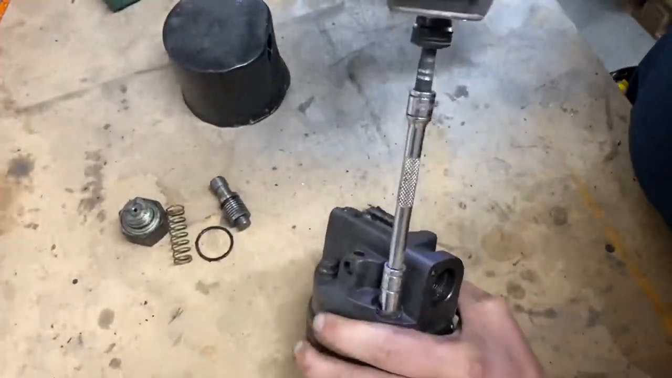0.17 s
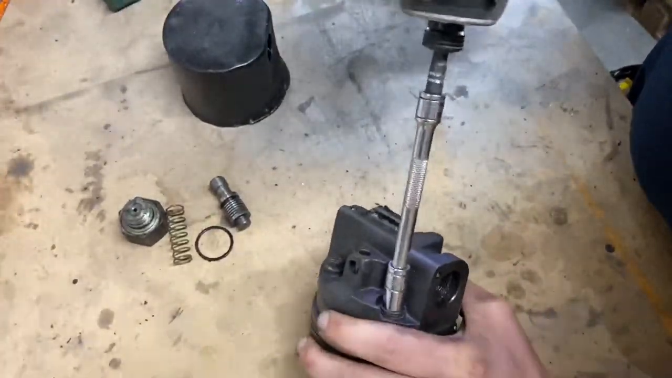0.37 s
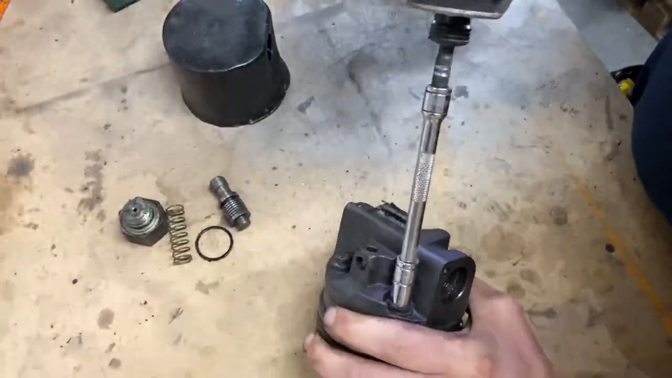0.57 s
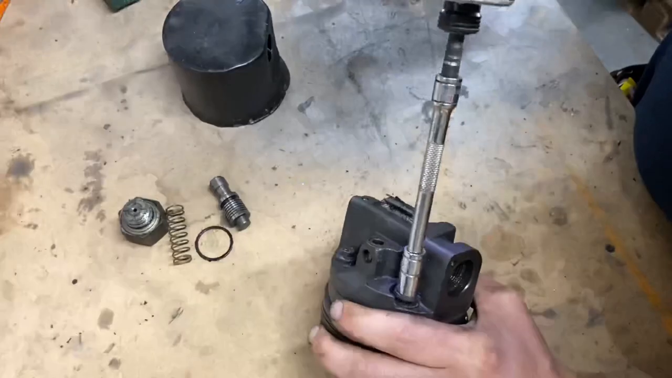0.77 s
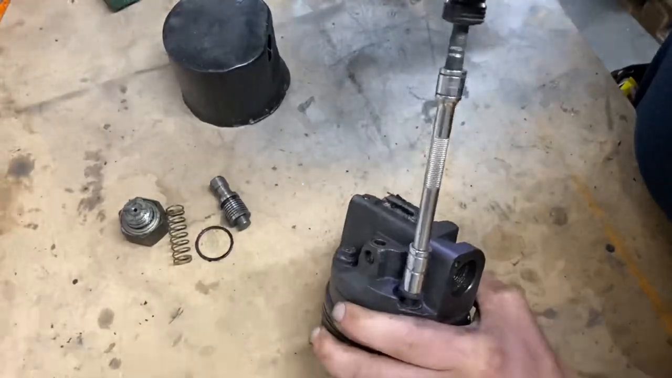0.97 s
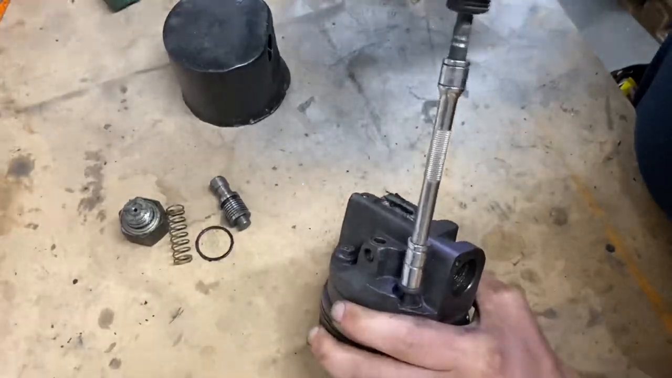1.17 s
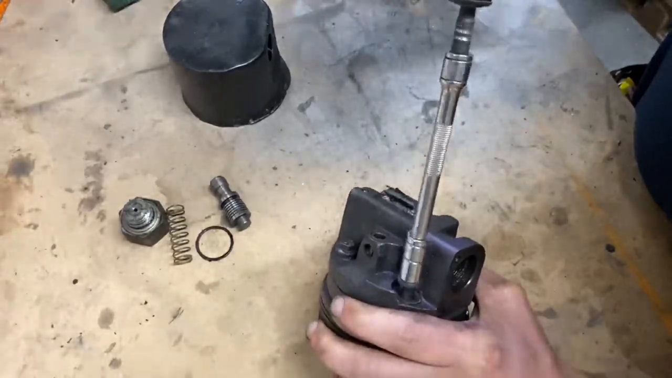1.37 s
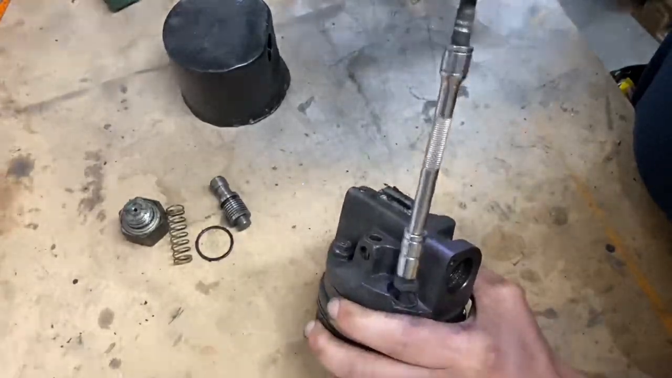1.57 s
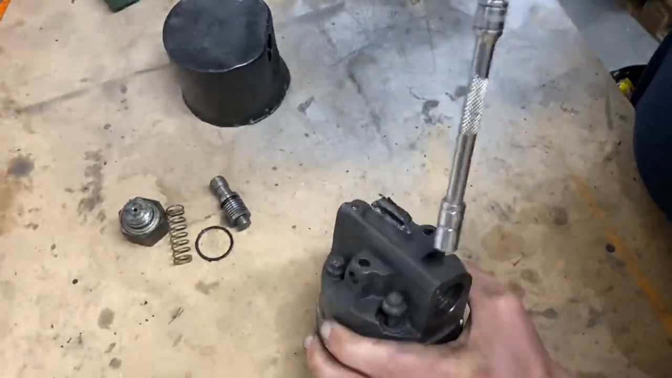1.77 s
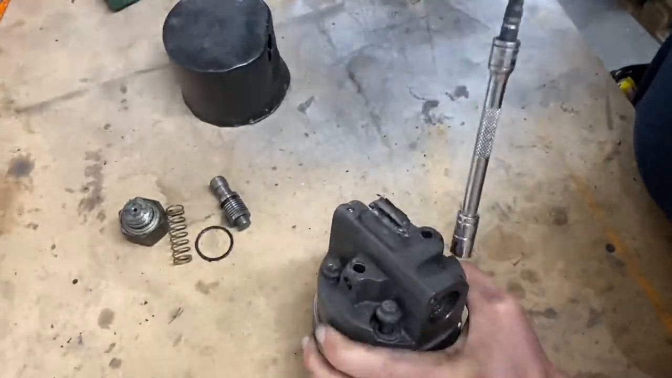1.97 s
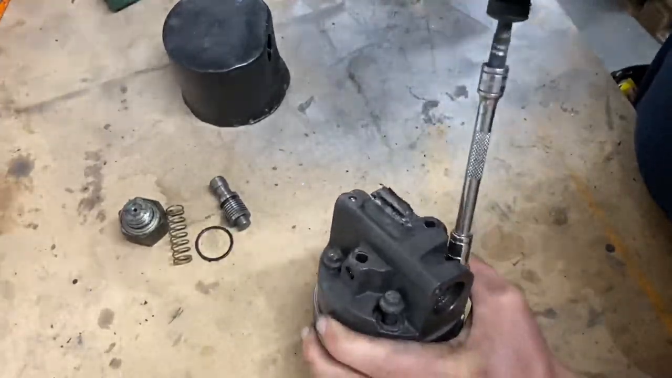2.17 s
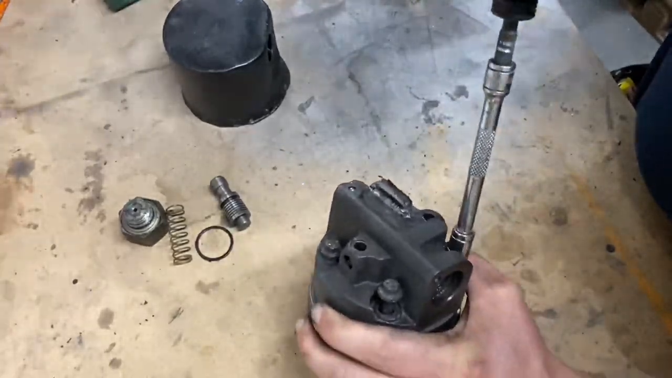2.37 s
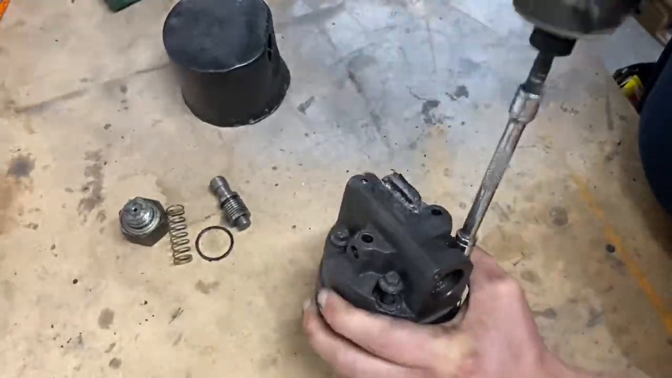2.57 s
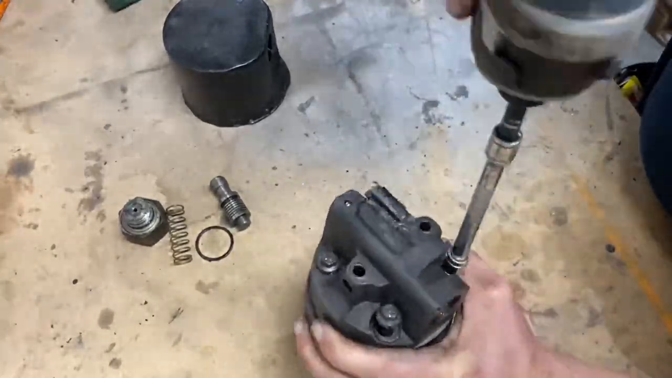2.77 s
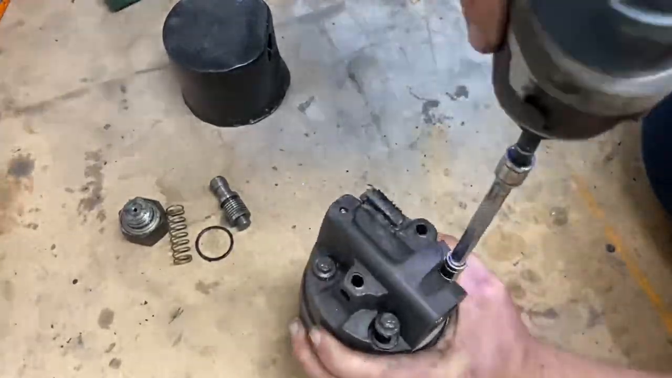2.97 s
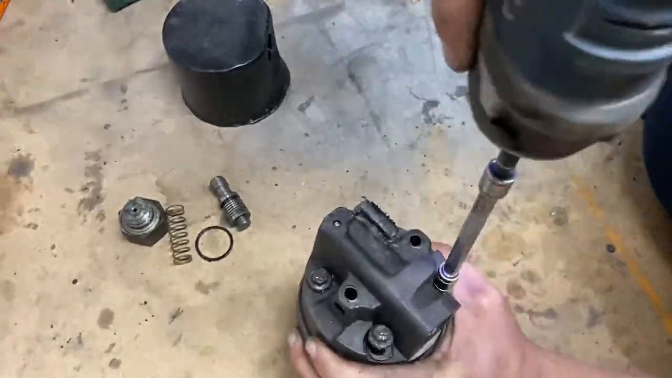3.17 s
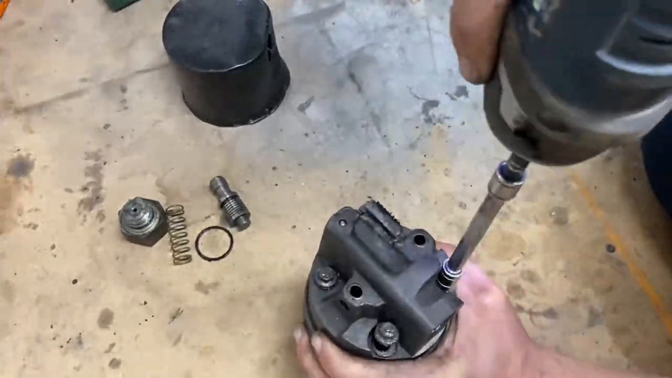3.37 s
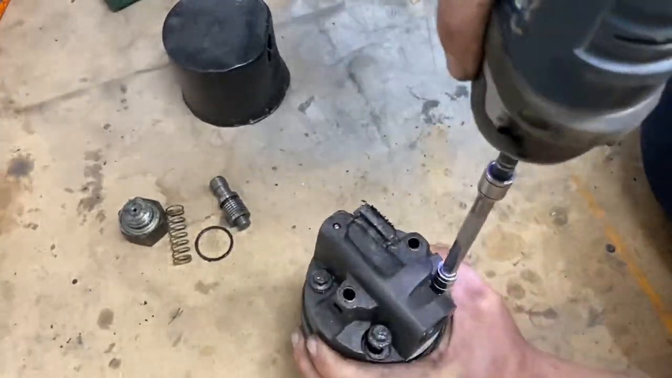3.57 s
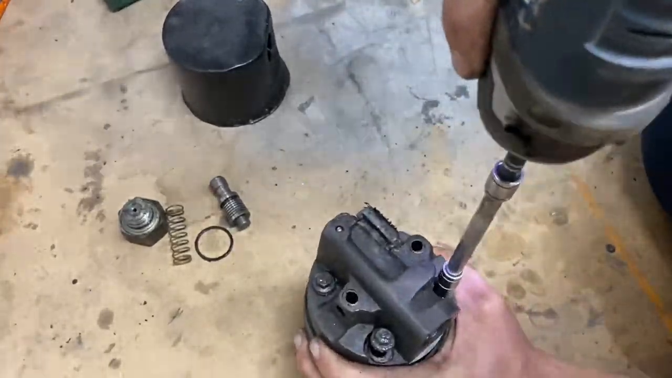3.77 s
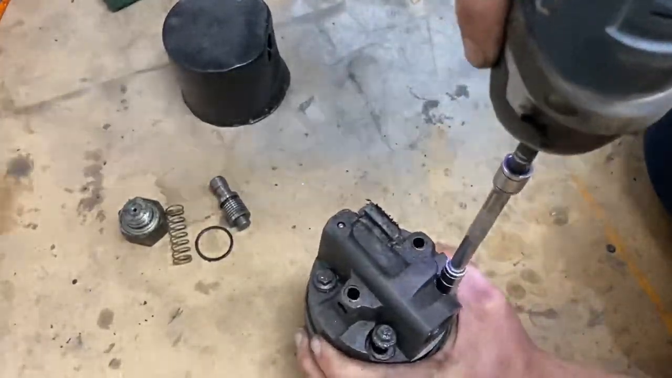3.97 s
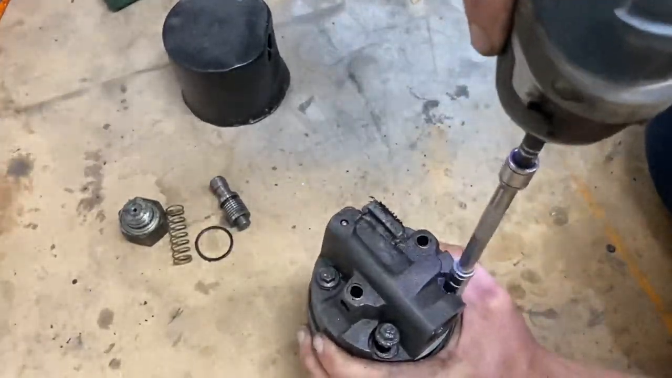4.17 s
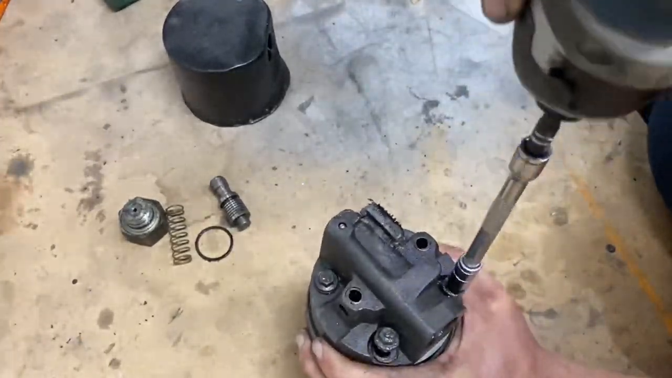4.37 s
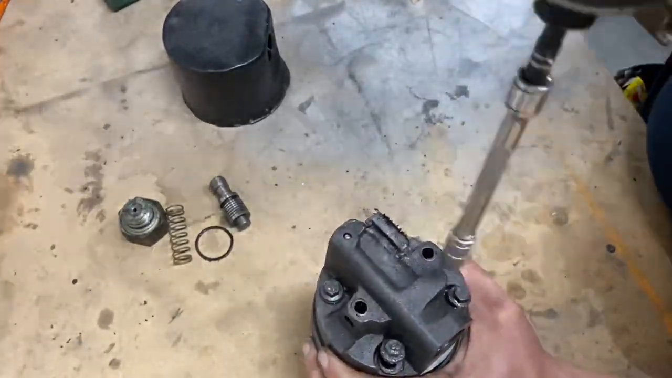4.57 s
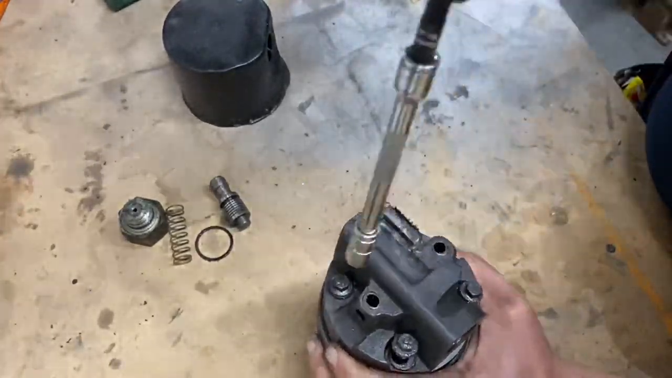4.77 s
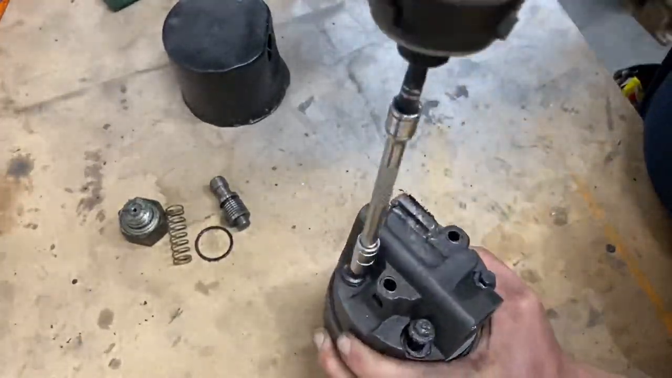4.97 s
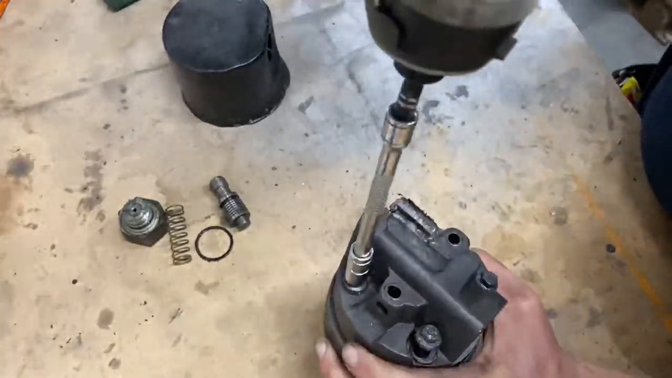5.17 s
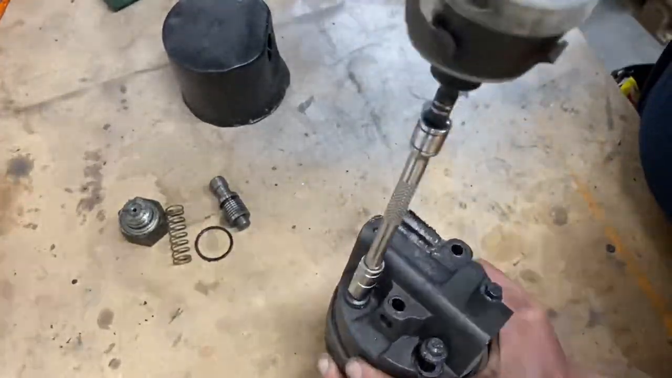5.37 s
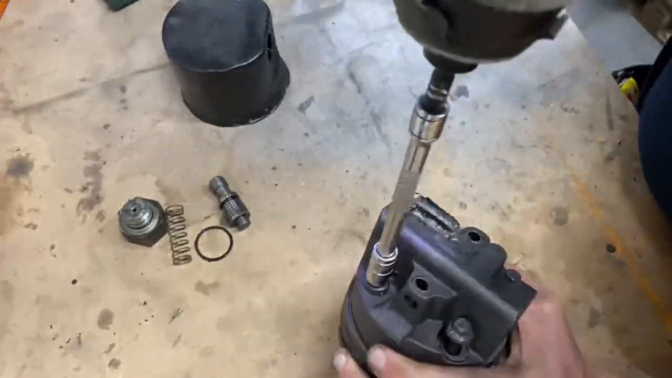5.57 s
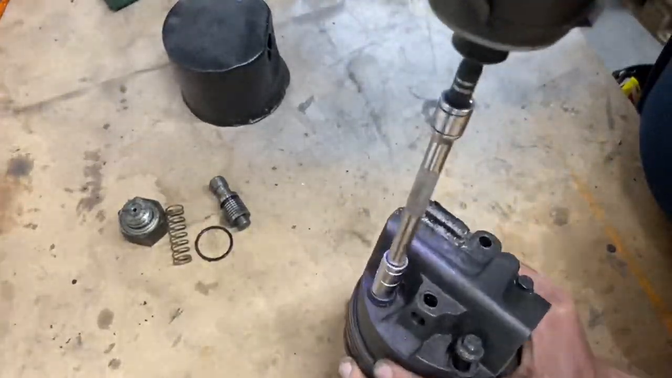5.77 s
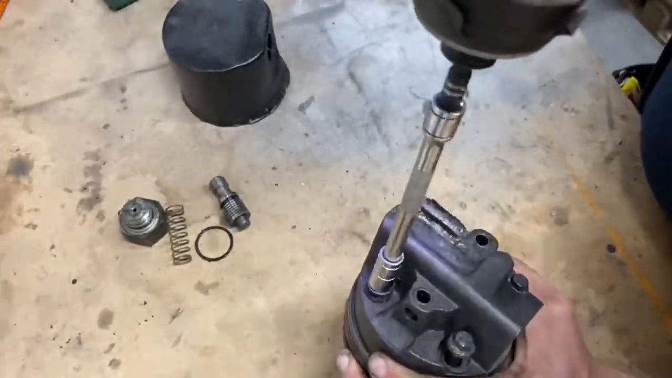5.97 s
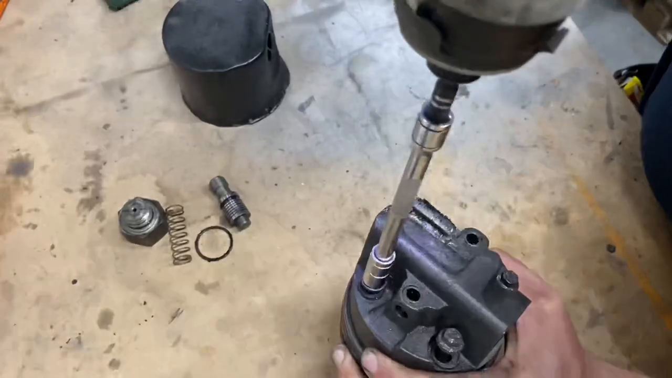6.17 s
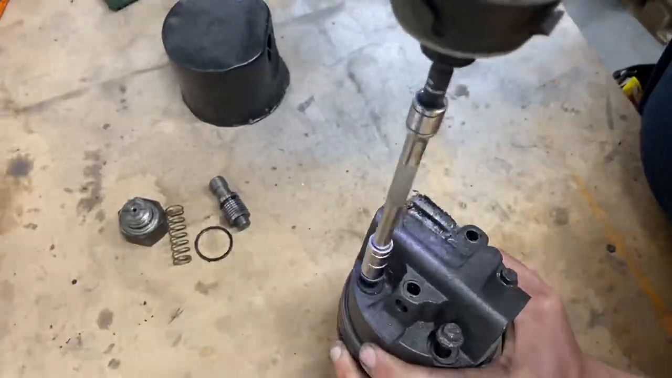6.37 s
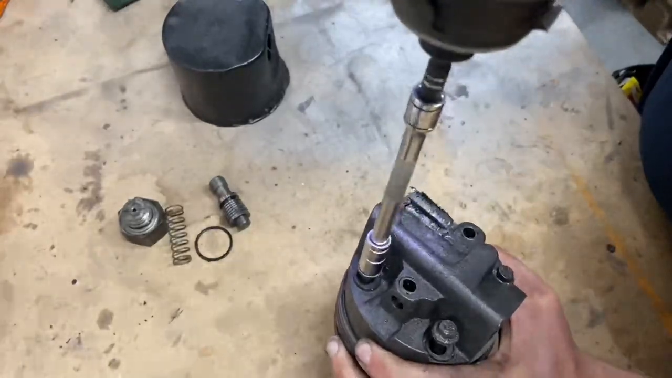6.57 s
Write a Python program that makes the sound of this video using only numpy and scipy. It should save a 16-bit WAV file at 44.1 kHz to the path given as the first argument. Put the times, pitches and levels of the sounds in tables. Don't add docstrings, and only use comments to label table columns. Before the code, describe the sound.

A cordless power driver whirs in three runs, hammering and rattling bolts loose from a metal casting, with socket clicks and knocks between.

```python
import sys
import numpy as np
from scipy import signal
from scipy.fft import rfft, irfft, next_fast_len
from scipy.io import wavfile
from scipy.ndimage import uniform_filter1d, map_coordinates

SR = 44100
rng = np.random.default_rng(int(sys.argv[2]) if len(sys.argv) > 2 else 0)


def inscribe(sig):
    pcm = np.round(np.clip(np.atleast_2d(sig).T, -1, 1) * 32767)
    wavfile.write(sys.argv[1], SR, pcm.astype(np.int16))


def to_linear_factor(level_db):
    exponent = np.asarray(level_db, float) / 20
    return 10 ** exponent


N = 291145
TIME = np.arange(N) / SR

# f/Hz, density/dB
SHOP = [(25, -34.5), (42, -2), (162, -2), (237, -6), (361, -7.5), (506, -6), (740, -15), (895, -11.5),
        (1550, -22), (2080, -14.5), (3240, -22.5), (5380, -22.5), (6500, -27.5), (8450, -59.5),
        (14300, -120)]
# t/s, level/dB
SHOP_DB = [(0.0, -45.5), (0.12, -53), (0.7, -59), (1.3, -53), (1.84, -64.5), (2.2, -57.5), (3.03, -62),
           (3.7, -61), (4.3, -60), (5.3, -60.5), (6.6, -50.5)]
# f/Hz, coherence/1
SHOP_ALIKE = [(60, 0.93), (130, 1), (290, 0.3), (640, 0.31), (1400, 0.44), (3100, 0.4), (6000, 0.18)]
# f/Hz, density/dB
MIC = [(5500, -44), (6800, 2), (8200, -0.5), (10000, -5), (12000, -3.5), (14000, -12.5), (15500, -15.5),
       (16000, -62.5)]
# f/Hz, level/dB rms
HUM = [(58, -64.5), (85, -66.5)]
# f/Hz, density/dB
FAR = [(1800, -33), (2050, -6.5), (2250, -3.5), (2500, -5.5), (2800, -33.5)]
# t/s, length/s, level/dB
FAR_SWELLS = [(2.05, .15, -73), (4.45, 0.23, -70), (4.85, 0.214, -67), (5.25, 0.11, -76)]
# t/s, f/Hz, level/dB, length/s
BUMPS = [
    (0.043, 95, -49.5, 0.74),
    (0.2622, 660, -15, 0.0033),
    (2.415, 170, -54, 0.079),
    (2.5, 200, -53, 0.047),
    (2.89, 190, -52.5, 0.09),
    (4.463, 180, -57.5, 0.12),
    (5.643, 413, -24.5, 0.0046),
    (5.645, 160, -48.5, 0.085),
]

# f/Hz, t60/s
ROOM = [(200, 0.23), (2000, 0.33), (6000, 0.12), (14000, 0.05)]
# f/Hz, level/dB
GLANCE = [(1500, -34), (2100, -23.5), (2700, -5.5), (4200, -2.5), (5000, -4), (6200, -15.5), (9000, -13.5),
          (16000, -7.5)]
GLANCE_T60_S = 0.016
# f/Hz, phase/rad
PORT_LEAD = [(60, -.15), (690, -.55), (2100, 0), (2800, .8), (3880, 1.3), (4700, -.8), (5400, .1),
             (6300, 1.6), (6750, 2.95), (7900, 3.35), (9500, 6.05), (11500, 6.45), (12700, 9.2),
             (14400, 9.65), (15800, 12.3)]
# f/Hz, level/dB
PORT_TILT = [(60, -.3), (200, -1), (380, -2.6), (700, -2.4), (1290, -2), (2070, -1.5), (2750, -6),
             (3450, -4.5), (4400, -3), (5500, 1), (6600, 0)]

# t/s, length/s, level/dB
RUSTLES = [(1.78, 0.091, -68), (1.93, 0.069, -72.5), (2.07, .07, -62), (2.22, 0.055, -74), (2.38, .08, -68),
           (2.55, .08, -68), (2.9, 0.11, -74.5), (4.62, 0.11, -72), (4.84, 0.07, -66), (5.07, 0.13, -64),
           (5.22, .08, -73), (5.35, 0.0597, -81)]
# f/Hz, density/dB
CLOTH = [(1500, -28), (2500, -17), (5000, -8.5), (6500, -10), (8000, -6.5), (10000, -5), (12000, -12),
         (15500, -32.5)]
# t/s, length/s, level/dB
CHATTER = [
    (3.09, 0.08, -45),
    (3.42, 0.36, -38),
]
# f/Hz, density/dB
SHUDDER = [(400, -40), (540, -10), (650, 1.5), (780, -9.5), (1000, -39)]
# t/s, length/s, level/dB
RATTLES = [
    (3.62, 0.092, -42.5),
    (3.97, 0.38, -36),
]
# f/Hz, density/dB
RATTLE = [(1200, -38.5), (1420, -7.5), (1580, 1.5), (1750, -7.5), (2100, -33)]

# t/s, peak level/dB, ring f/Hz, t60/s
TICKS = [(2.1325, -30, 3750, .008), (2.1935, -38.5, 3500, .014), (2.1993, -32.5, 3000, 0.0056),
         (2.2596, -37, 2530, .008), (2.6185, -42, 8500, .008), (2.6276, -31, 8500, .006),
         (2.6852, -48.5, 3500, .01), (2.772, -46, 2210, 0.0099), (3.0019, -14.5, 2950, 0.0066),
         (3.038, -34, 2200, .006), (3.163, -6, 1710, 0.013), (3.1723, -11, 2200, .006),
         (3.109, -24, 3000, .005), (3.128, -22, 2500, .005), (3.188, -18.5, 1500, 0.0029),
         (3.2013, -11, 1800, 0.0077), (3.2051, -6, 4660, 0.0072), (4.9762, -23, 5830, 0.0038),
         (5.0008, -37, 4500, .006), (5.025, -33, 10800, .007), (5.1032, -32, 4600, .008),
         (5.1599, -34, 6000, 0.005), (5.1648, -23, 2420, 0.0049), (5.3156, -32, 5070, 0.0047),
         (5.4445, -58, 9500, .006), (5.4541, -24.5, 2200, 0.004)]
TICK_SNAP_DB = -5.5
# t/s, peak level/dB, thud/dB re peak, edge/dB re peak
BLOWS = [(0.2640, -12, -24.5, -12.5), (0.2672, -18.5, -24.5, -6.5), (0.2699, -8, -14, -10.5),
         (0.2804, -10.5, -16, -4.5), (0.2875, -14, -23.5, -8), (0.3082, -13.5, -13.5, -7.5),
         (0.3135, -22, -8, -3), (3.1508, -8.5, -15.5, -15.5), (3.1605, -13, -12, -3.5),
         (3.164, -15, -12, -8.5), (3.1714, -11, -15, -7), (3.1755, -16.5, -13.5, -17.5),
         (3.1992, -8, -21.5, -12.5), (3.2052, -17.5, -20, -4.5), (5.6375, -13.5, -10.5, -14)]
# t/s, peak level/dB, thud/dB re peak, edge/dB re peak
KNOCKS = [(0.0543, -26.5, -9.5, -4), (0.1795, -37, -16.5, -16.5), (2.1312, -33.5, -16.5, -5.5),
          (2.199, -30.5, -15.5, -12), (2.2578, -38, -12, -11), (2.356, -42, -11, -11),
          (2.4863, -20.5, -3.5, -12), (2.5004, -28.5, -16.5, -15), (2.6274, -27.5, -12.5, -18.5),
          (2.6833, -43.5, -8, -13.5), (2.772, -41, -18, -18), (2.8317, -52, -9, -2.5),
          (2.9437, -30.5, -11.5, -14.5), (3.002, -26, -13.5, -8.5), (3.0095, -25, -9, -17),
          (4.3294, -36, -15, -22), (4.4096, -45, -10, -11), (4.586, -55, 0, -1.5), (4.9752, -35, -18, -3),
          (5.0, -40, -9, -8.5), (5.0248, -32.5, -9, -9), (5.1026, -32, -9, -18), (5.1633, -21, -8.5, -12),
          (5.3085, -33, -3, -19), (5.3294, -39.5, -19, -26), (5.3544, -49, -11, -18),
          (5.4495, -32, -10, -31), (5.456, -39, -5.5, -27), (5.445, -42.5, -3.5, -20),
          (2.949, -30.5, -8.5, -23), (2.4835, -40, -1.5, -13), (5.4791, -49, -9, -11),
          (5.5433, -41, -16, -16.5)]
# t/s, peak level/dB, thud/dB re peak, edge/dB re peak
FURTHER_KNOCKS = [(0.191, -41, -15, -14.5), (0.204, -39, -3, -15.5), (0.214, -41.5, -15, -18),
                  (1.8687, -58, -2, 0.5), (0.1652, -45, -9, -19), (2.193, -33.5, -14, -12), (2.245, -43.5, -2, -4),
                  (2.4665, -41, -3, -10), (2.618, -48, -4, -7.5), (2.984, -28.5, -13, -15),
                  (5.159, -30.5, -18, -8), (5.285, -44.5, -4, -23), (5.316, -36, -10, -8.5), (4.35, -49, -3, -22),
                  (5.432, -44, 4, -24), (5.575, -47, -9, -18), (5.605, -36, -2, -22)]
# f/Hz, level/dB, t60/s
CASTING = [(619, -2.5, 0.098), (1020, -11.5, 0.029), (1550, -15, 0.023), (2573, -5.5, 0.03),
           (3490, -8, 0.038), (4950, -7, 0.025)]
# f/Hz, density/dB
CLACK = [(600, -16), (1100, -3), (1700, -1), (2700, -5.5), (3300, -9), (4200, -39.5)]
# f/Hz, density/dB
THUD = [(100, -30.5), (200, -29), (380, -3.5), (600, -5), (950, -8.5), (1500, -67)]
# f/Hz, density/dB
EDGE = [(2800, -30), (3700, -2.5), (5000, -2), (7500, -0.5), (9000, -25.5)]
# f/Hz, density/dB
HISS = [(5500, -39.5), (6800, 3), (8200, 0.5), (9500, -5.5), (12000, -3.5), (14000, -8.5), (15500, -4),
        (16000, -48.5)]
FIZZ_PER_EDGE, FIZZ_DB = 1.24, -3.5
LIGHT_IS_SHORT = 0.14
GRAZE_S, GRAZE_DB = .003, -18
MODE_SCATTER_DB = 2.5

# multiple of the mesh rate/1, level/dB
ORDERS_A = [(.5, -6), (1, 0.5), (1.5, -6.5), (2, -3.5), (2.5, 0), (3, -2), (3.5, -32.5), (4, -4), (4.5, -8),
            (5, -7), (5.5, -23), (6, -4.5), (6.5, -6), (7, -5.5), (8, -26), (9, -10), (10, -20)]
ORDERS_B = [(.5, -9), (.87, -11), (1, -9), (1.5, -15), (2, -5), (2.5, -6), (3, 1), (3.5, -2), (4, 2),
            (4.5, -11), (5, -10), (5.5, -13), (6, -1), (6.5, -14), (7, -9), (8, -6), (9, -20), (11, -17),
            (12, -20)]
ORDERS_C = [(.5, -13), (1, -1.5), (1.5, -9.5), (2, 1.5), (2.5, -9), (3, -1), (3.5, -16), (4, -4.5),
            (4.5, -16), (5, -7.5), (5.5, -14), (6, -4), (6.5, -16), (7, -7), (8, -18), (9, -17), (10, -19),
            (12, -20)]
# multiple of the mesh rate/1, level/dB
SLOW_A = [(.5, -22.5), (1, -7.5), (1.5, -12), (2, -8.5), (2.5, -7.5), (3, -3), (3.5, -0.5), (4, -5.5),
          (4.5, -5), (5, 1.5), (5.5, -10.5), (6, -6), (6.5, -13.5), (7, -6.5), (8, -11), (9, -9),
          (10, -12.5), (11, -14), (12, -13.5)]
SLOW_C = [(1, -7.5), (2, -12.5), (3, -5.5), (4, -0.5), (5, 5.5), (6, -17), (7, -23), (8, -18), (9, -14),
          (10, -22), (11, -29), (12, -10)]
# f/Hz, width/Hz, level/dB
HOUSING = [(580, 22, -9), (1750, 160, -5.5), (2420, 110, -4.5), (4650, 3400, -23)]
# f/Hz, density/dB
GRIND = [(150, -41), (300, -30.5), (480, -3.5), (750, -6), (1400, -4.5), (2400, -1.5), (3400, -6.5),
         (4600, -7.5), (6500, -10.5), (8000, -28.5)]
# f/Hz, density/dB
SHELL = [(1500, -28.5), (1900, -4.5), (2200, -11), (2550, 1), (2900, -16.5), (3300, -27.5)]
# t/s, tooth-mesh f/Hz, level/dB
NUDGE = [
    (0.0, 336, -33),
    (0.012, 302.4, -48),
    (0.046, 267, -39.5),
    (0.05, 255, -40.5),
    (0.074, 228.5, -31),
    (0.151, 143, -66),
]
# t/s, tooth-mesh f/Hz, level/dB
CREEP_A = [(.335, 443, -34.5), (0.371, 448.5, -36), (.38, 449, -31), (.431, 452, -36.5),
           (0.481, 461, -32.5), (.517, 474.3, -30), (0.588, 479.2, -33.5), (.627, 450.6, -30),
           (.67, 394.3, -30.5), (.715, 390.7, -36.5), (.753, 385, -31), (.785, 416, -35.5)]
FULL_A = [(0.817, 618, -23), (0.837, 795.4, -29), (0.853, 887, -22.5), (0.875, 963, -25.5),
          (1.01, 951.3, -26), (1.509, 961, -25.5)]
# t/s, tooth-mesh f/Hz, level/dB
PULL_B = [(3.25, 728.5, -29), (3.306, 710.6, -30.5), (3.356, 734.7, -29.5), (3.406, 716.2, -30),
          (3.45, 732.6, -27), (3.72, 772, -28.5), (3.82, 777.5, -26), (3.86, 771.6, -28), (4.191, 764, -27)]
PULL_C = [(5.655, 469.2, -27.5), (5.685, 506.9, -27), (5.705, 524.3, -25.5), (5.743, 540.2, -27.5),
          (5.775, 529.1, -28), (5.811, 535.3, -23), (5.885, 556.6, -27.5), (5.901, 582.4, -26.5),
          (5.923, 648.3, -18), (5.945, 782.3, -24.5), (5.981, 866.7, -23.5), (6.0, 897, -23.5),
          (6.09, 923.3, -23), (6.25, 890.4, -23.5), (6.53, 904, -23.5)]
# trigger touched t/s, gears bite t/s, braking length/s, loudest of carrier turn t/s, planet phase/rad
TRIGGER_A = (.185, .255, 0.0934, 1.165, -0.92)
TRIGGER_B = (3.03, 3.125, 0.062, 3.788, 7.4)
TRIGGER_C = (5.612, 5.636, 0.086, 6.285, 0.87)
# t/braking lengths, speed share/1, level/dB re the last steady value
BRAKE = [(.3, .96, 0), (0.751, 0.82, -0.5), (1.1, 0.8, -2), (1.4, 0.71, -9.5), (1.52, .7, -24.5),
         (2.5, 0.56, -33)]
BRAKE_GRIP = [
    1,
    .55,
    1,
]
START_SPEED, BITE_SPEED = .55, .85
START_DB, HALF_WAY_DB, BITE_DB = -31, -8, 4
START_CLEAN, BRAKE_CLEAN = .08, .85
MESHES_PER_TURN, MESHES_PER_PLANET = 64.6, 23
THROB_DB, PLANET_DB = -0.8, 1.56
FULL_HZ, SLOW_HZ, FAST_HZ = 920, 560, 760
HISS_DB, HISS_DB_PER_OCTAVE = -13.5, 5
CLEAN, CLEAN_PER_OCTAVE, STRAIN_BLURS = .48, -.1, .14
SHELL_DB = -6.5


def unit(x):
    return x / np.sqrt(np.mean(x ** 2) + 1e-20)


def along(points, hz):
    f, v = np.transpose(points)
    return np.interp(np.log(hz + 1), np.log(f + 1), v)


def wobble(rate, count):
    coarse = np.arange(0, count + 32, 32)
    knots = rng.standard_normal(int(coarse[-1] * rate / SR) + 4)
    return np.interp(np.arange(count), coarse, map_coordinates(knots, [coarse * rate / SR]))


def filtered(x, response):
    m = next_fast_len(x.shape[-1] + 8192)
    return irfft(rfft(x, m) * response(np.fft.rfftfreq(m, 1 / SR)), m)[..., :x.shape[-1]]


def noise(spectrum, count, rows=()):
    m = next_fast_len(count)
    shape = to_linear_factor(along(spectrum, np.fft.rfftfreq(m, 1 / SR)))
    white = rng.standard_normal((*rows, m))
    return unit(irfft(rfft(white) * shape, m)[..., :count])


def swells(rows):
    return sum(to_linear_factor(db) / (1 + (2 * (TIME - s) / length) ** 2) ** 2 for s, length, db in rows)


def shop():
    def mix(hz):
        half_angle = np.arccos(np.clip(along(SHOP_ALIKE, hz), -1, 1)) / 2
        return to_linear_factor(along(SHOP, hz)) * [np.cos(half_angle), np.sin(half_angle)]

    s, rumble_db = np.transpose(SHOP_DB)
    mid, side = filtered(rng.standard_normal((2, N)), mix)
    level_db = np.interp(TIME, s, rumble_db) + 0.5 + 3.4 * wobble(14, N)
    rumble = unit(np.array([mid + side, mid - side])) * to_linear_factor(level_db)
    return rumble + to_linear_factor(-75 + 3.5 * wobble(6.4, N)) * noise(MIC, N)


def bench():
    out = np.zeros(N)
    for hz, db in HUM:
        level = to_linear_factor(db - 0.5 + 3.8 * wobble(8.0, N))
        out += level * np.sin(2 * np.pi * hz * TIME + 0.44 * wobble(2.6, N))
    for s, hz, db, length in BUMPS:
        out += to_linear_factor(db) * np.exp(-(2 * (TIME - s) / length) ** 2) * np.sin(2 * np.pi * hz * TIME)
    return out


def room(x):
    hz, t, z = signal.stft(rng.standard_normal((2, SR // 2)), SR, nperseg=256)
    decay = to_linear_factor(-60 * t / along(ROOM, hz)[:, None])
    tail = signal.istft(z * decay, SR, nperseg=256)[1]
    same = tail * [[1], [0]] + tail[::-1] * [[0], [1]]
    tail = same + filtered(tail - same, lambda f: 1 / (1 + (f / 4500) ** 8))
    tail = tail / np.linalg.norm(tail[0])
    return signal.fftconvolve(np.pad(x, (250, 0))[None], tail, axes=1)[:, :N]


def glance(x):
    t = TIME[:1500]
    taps = rng.standard_normal(len(t)) * to_linear_factor(-60 * t / GLANCE_T60_S)
    echo = signal.fftconvolve(np.pad(x, (30, 0)), taps / np.linalg.norm(taps))[:N]
    return filtered(echo, lambda hz: to_linear_factor(along(GLANCE, hz))) * [[1], [-1]]


def handling():
    rustle = swells(RUSTLES) * noise(CLOTH, N)
    shudder = swells(CHATTER) * to_linear_factor(3 * wobble(30, N)) * noise(SHUDDER, N)
    rattle = swells(RATTLES) * to_linear_factor(4.3 * wobble(70, N)) * noise(RATTLE, N)
    return rustle + shudder + rattle + swells(FAR_SWELLS) * noise(FAR, N)


def ticks():
    s, db, hz, t60 = np.transpose(TICKS)[:, :, None]
    t = TIME[:900]
    snap = filtered(rng.standard_normal((2, len(TICKS), len(t))), lambda f: f / (f + 2500))
    ring = np.sin(2 * np.pi * hz * t) * to_linear_factor(-60 * t / t60)
    burst = to_linear_factor(db) * (ring + to_linear_factor(TICK_SNAP_DB - 90 * t / t60) * snap)
    burst *= 1 - np.exp(-t / 0.00016)
    where = (np.round(s * SR).astype(int) + np.arange(len(t))).ravel()
    ports = np.array([np.bincount(where, port.ravel(), N) for port in burst])
    return filtered(ports, lambda f: 1 / (1 + (700 / (f + 1)) ** 4))


def grazed(events):
    return np.vstack([events, np.add(events, [-GRAZE_S, GRAZE_DB, 0, 0])])


def hits(events, ring_db, rise_s, t60):
    s, db, thud_db, edge_db = np.transpose(events)[:, :, None]
    fizz_db = FIZZ_DB + FIZZ_PER_EDGE * edge_db
    t, rows = TIME[:4000], (len(events),)
    short = to_linear_factor(LIGHT_IS_SHORT * (db - db.max()))
    lives = t / np.maximum(t60 * short, .006)
    burst = noise(CLACK, len(t), rows) * to_linear_factor(-60 * lives)
    burst += to_linear_factor(thud_db + 3.0) * noise(THUD, len(t), rows) * to_linear_factor(-35 * lives)
    burst += to_linear_factor(edge_db + 10.5) * noise(EDGE, len(t), rows) * to_linear_factor(-100 * lives)
    burst += to_linear_factor(fizz_db + 16.5) * noise(HISS, len(t), rows) * to_linear_factor(-140 * lives)
    for hz, mode_db, decay in CASTING:
        scatter = rng.standard_normal((len(events), 2, 1))
        heavy_db = thud_db + 11.5 if hz < 900 else 0
        scatter_db = MODE_SCATTER_DB * np.clip(scatter[:, 0], -2, 1)
        size = to_linear_factor(ring_db + heavy_db + mode_db + scatter_db - 60 * t / (decay * short))
        burst += size * np.sin(2 * np.pi * hz * (1 + 0.068 * scatter[:, 1]) * t)
    burst *= to_linear_factor(db - 4.5) * (1 - np.exp(-t / rise_s))
    where = np.round(s * SR).astype(int) + np.arange(len(t))
    return np.bincount(where.ravel(), burst.ravel(), N)[:N]


def switching():
    on = np.interp(TIME, [0, 1.6, 1.65, 2.93, 2.96, 4.22, 4.26, 5.6, 5.63],
                   [0.43, .3, 0, 0, 0.86, 0.81, 0, 0, .4])
    return to_linear_factor(-48.5 + 1.5 * wobble(15, N)) * on * np.sin(2 * np.pi * 15550 * TIME)


def housing(hz):
    peaks = sum(to_linear_factor(db) / np.sqrt(1 + (2 * (hz - c) / w) ** 2) for c, w, db in HOUSING)
    return (0.041 + peaks) / (1 + (450 / hz) ** 2)


def controls(pull, trigger, grip):
    touch_s, bite_s, brake_s = trigger[:3]
    (_, hz, db), (end_s, end_hz, end_db) = pull[0], pull[-1]
    half_speed = (START_SPEED + BITE_SPEED) / 2
    spin_up = [(touch_s, START_SPEED * hz, db + START_DB, START_CLEAN),
               ((touch_s + bite_s) / 2, half_speed * hz, db + HALF_WAY_DB, START_CLEAN),
               (bite_s, BITE_SPEED * hz, db + BITE_DB, START_CLEAN)]
    brake = [(end_s + u * brake_s, share ** grip * end_hz, end_db + rel_db, BRAKE_CLEAN)
             for u, share, rel_db in BRAKE]
    return spin_up + [(*row, 1) for row in pull] + brake


def gear_whine(mesh_hz, mesh, turn, fast, strain, orders, slow_orders):
    n, top_hz = len(mesh), mesh_hz.max()
    out = np.zeros(n)
    speeds_hz = np.arange(mesh_hz.min(), top_hz + 1)
    usual_hz = np.interp(speeds_hz, [SLOW_HZ, FAST_HZ], [500, top_hz])
    fast_db, slow_db = dict(orders), dict(slow_orders)
    for k in sorted({*fast_db, *slow_db}):
        db = fast * fast_db.get(k, -35) + (1 - fast) * slow_db.get(k, -28)
        if k % 1 == 0:
            blur = (.42 if k > 3.9 or k == 1 else .7) + .15 * (1 - fast)
        else:
            blur = .7 if k == .5 else 1.3
        shift = rng.normal(0, 1.0, size=2)
        beads_db = 4.2 * np.cos(turn + shift[0]) + 2.8 * np.cos(2 * turn + shift[1])
        beads_db = beads_db * (.6 if k in (1, 4, 6) else 1)
        uneven_db = 3 * wobble(60, n)
        body_gain = (housing(k * speeds_hz) / housing(k * usual_hz)) ** 1.3
        size = to_linear_factor(db + beads_db + uneven_db) * np.interp(mesh_hz, speeds_hz, body_gain)
        jitter = .5 * np.cos(2 * turn + shift[0]) + (blur + strain) * wobble(90, n)
        out += size * np.sin(k * mesh + jitter)
    return out / np.sqrt(np.abs(uniform_filter1d(out ** 2, size=9000)) + 1e-12)


def gears(run, orders, slow_orders, loud_s, planet):
    s, *cols = np.vstack(run).T
    first, last = round(s[0] * SR), min(round(s[-1] * SR), N)
    t, n = TIME[first:last], last - first
    mesh_hz, level_db, free = [np.interp(t, s, c) for c in cols]
    meshes = np.cumsum(mesh_hz) / SR
    turn = 2 * np.pi * (meshes - np.interp(loud_s, t, meshes)) / MESHES_PER_TURN
    spin = 2 * np.pi * (meshes - meshes[np.argmax(free)]) / MESHES_PER_PLANET + planet
    level_db = level_db + THROB_DB * np.cos(turn) + PLANET_DB * np.cos(spin)
    octaves = np.log2(mesh_hz / FULL_HZ)
    flutter = 0.0078 * np.sin(turn) + 0.0058 * np.sin(2 * turn + 1.8) + 0.00304 * wobble(40.53, n)
    mesh = 2 * np.pi * np.cumsum(mesh_hz * (1 + flutter)) / SR
    strain = .07 * uniform_filter1d(np.abs(np.gradient(np.log(mesh_hz))) * SR, size=900)
    fast = np.clip((mesh_hz - SLOW_HZ) / (FAST_HZ - SLOW_HZ), 0, 1)
    whine = gear_whine(mesh_hz, mesh, turn, fast, strain, orders, slow_orders)

    teeth = (1 + 0.39 * np.cos(mesh)) * to_linear_factor(1.1 * np.cos(turn) + 0.21 * np.cos(2 * turn))
    rough = noise(GRIND, n) + (1 - fast) * to_linear_factor(SHELL_DB) * noise(SHELL, n)
    grind = unit(rough * teeth * to_linear_factor(2.2 * wobble(120, n)))
    hiss_db = HISS_DB + HISS_DB_PER_OCTAVE * octaves
    hiss = to_linear_factor(hiss_db + 4.5 + 2.0 * wobble(90, n)) * noise(HISS, n) * teeth

    clean = 1.25 * (CLEAN + CLEAN_PER_OCTAVE * octaves) * free / (1 + STRAIN_BLURS * strain)
    clean = np.clip(clean, 0, .95)
    surge_db = np.maximum(level_db - uniform_filter1d(level_db, size=5000), 0)
    body = np.sqrt(clean) * whine
    body += np.sqrt(1 - clean) * grind * to_linear_factor(-.8 * surge_db) + hiss * to_linear_factor(-.76 * surge_db)
    fade = np.clip(np.minimum((t - s[0] + .002) / 0.0071, (s[-1] - t) / 0.015 + (last == N)), 0, 1)
    return np.pad(to_linear_factor(level_db - .5) * fade * body, (first, N - last))


def driver():
    out = gears([(*row, .3) for row in NUDGE], ORDERS_A, SLOW_A, 0.057, 0)
    pulls = [(list(CREEP_A) + list(FULL_A), TRIGGER_A, ORDERS_A, SLOW_A),
             (PULL_B, TRIGGER_B, ORDERS_B, ORDERS_B),
             (PULL_C, TRIGGER_C, ORDERS_C, SLOW_C)]
    for grip, (pull, trigger, orders, slow) in zip(BRAKE_GRIP, pulls):
        out += gears(controls(pull, trigger, grip), orders, slow, *trigger[3:])
    return out


def scene():
    tool = filtered(driver(), lambda hz: (hz < 15750) / (1 + (300 / (hz + 1)) ** 6)) + switching()
    blows = hits(BLOWS, ring_db=-3.0, rise_s=0.00047, t60=0.031)
    knocks = hits(grazed(list(KNOCKS) + list(FURTHER_KNOCKS)), ring_db=-10.0, rise_s=0.00092, t60=0.038)
    direct = tool + blows + knocks
    reverberant = room(to_linear_factor(-14.5) * tool + to_linear_factor(-18.0) * blows + to_linear_factor(-14.0) * knocks)
    return ticks() + direct + glance(direct) + reverberant + shop() + bench() + handling()


def roll_off(x):
    return signal.sosfilt(signal.butter(12, 17160, fs=SR, output="sos"), x)


def record(dry):
    f, lead = np.transpose(PORT_LEAD)
    sides = np.array([[.5], [-.5]])

    def port_response(hz):
        return to_linear_factor(sides * along(PORT_TILT, hz)) * np.exp(1j * sides * np.interp(hz, f, lead))

    ports = filtered(dry, port_response)
    ports = ports / (1 + np.abs(ports) ** 6) ** (1 / 6)
    ports = filtered(ports, lambda hz: 1 / (1 + (hz / 16100) ** 60))
    return roll_off(ports)


dry = scene()
out = record(dry)
inscribe(out)
```